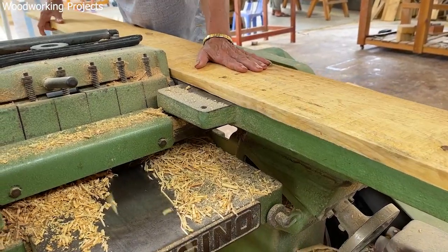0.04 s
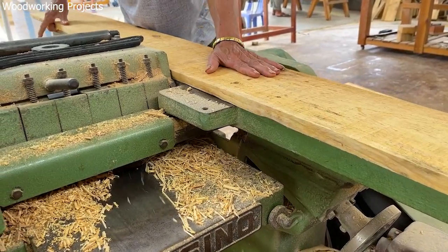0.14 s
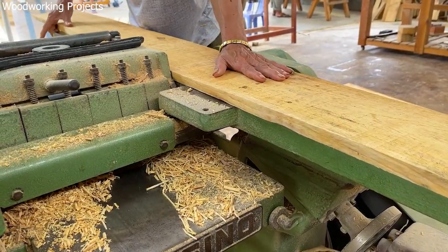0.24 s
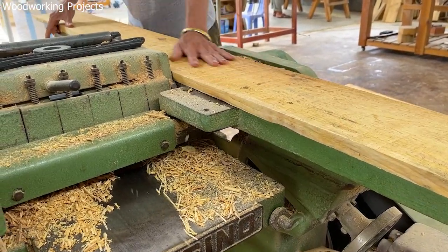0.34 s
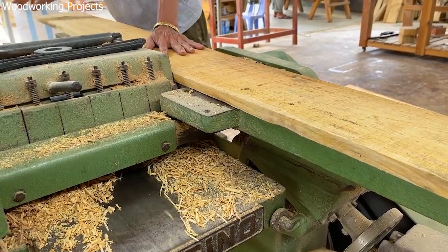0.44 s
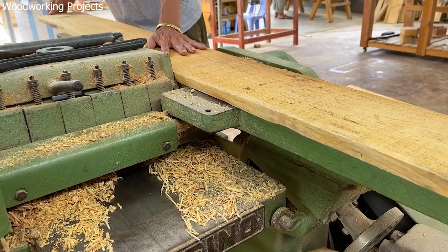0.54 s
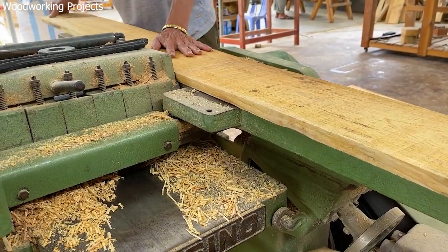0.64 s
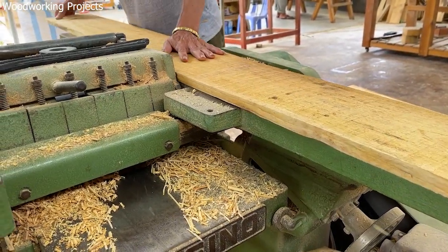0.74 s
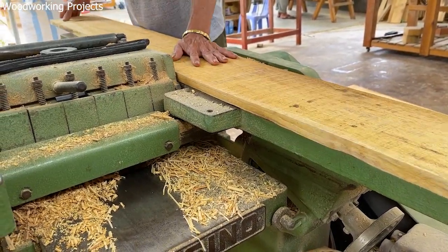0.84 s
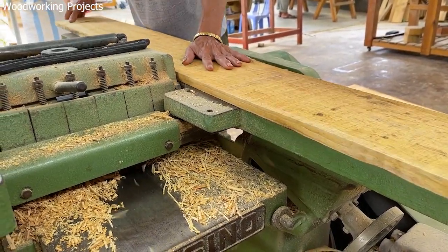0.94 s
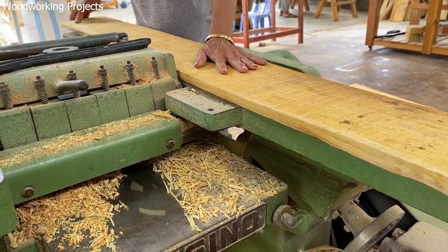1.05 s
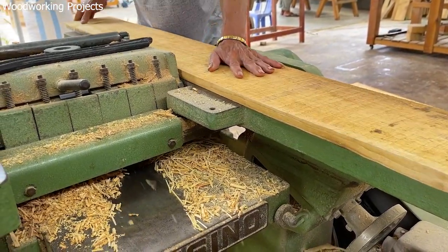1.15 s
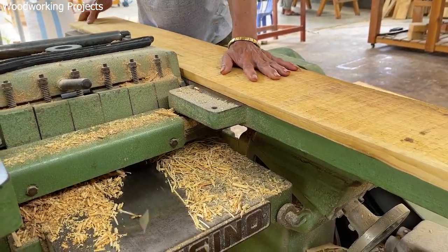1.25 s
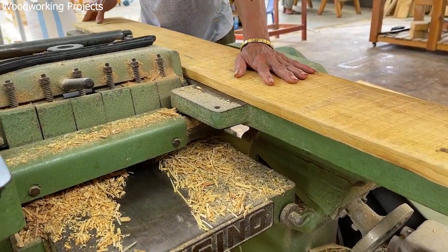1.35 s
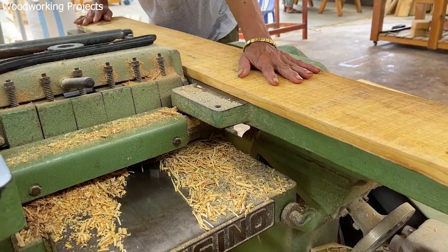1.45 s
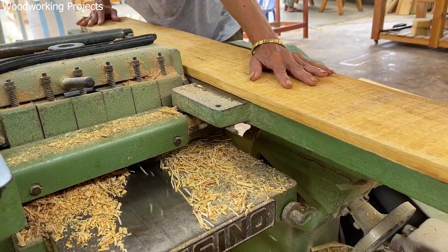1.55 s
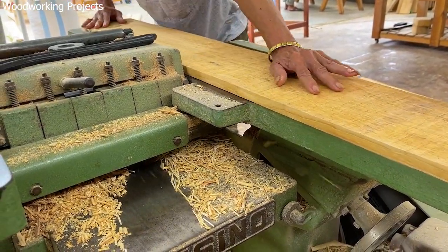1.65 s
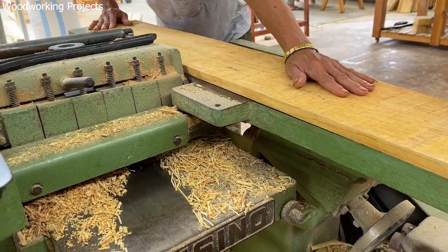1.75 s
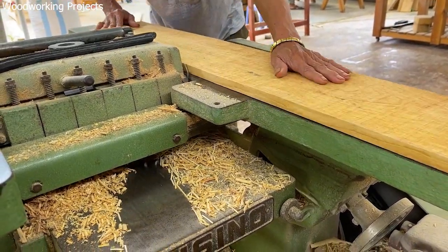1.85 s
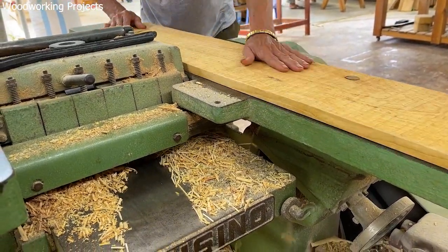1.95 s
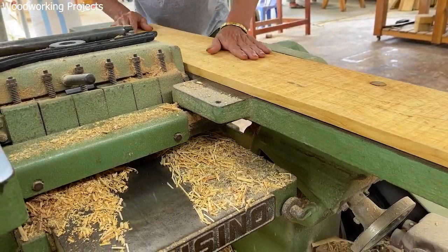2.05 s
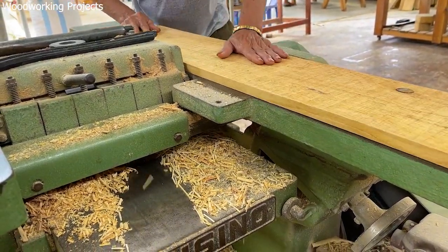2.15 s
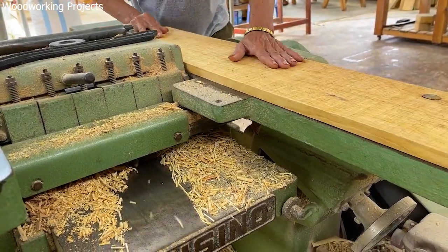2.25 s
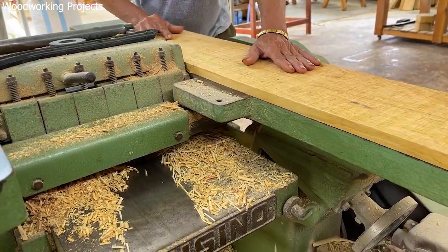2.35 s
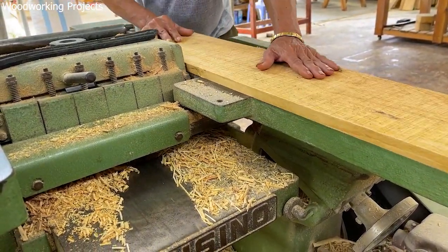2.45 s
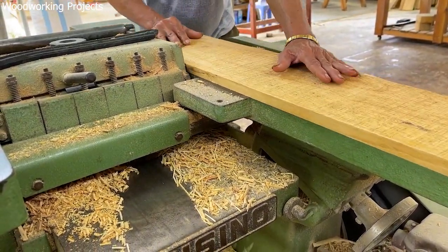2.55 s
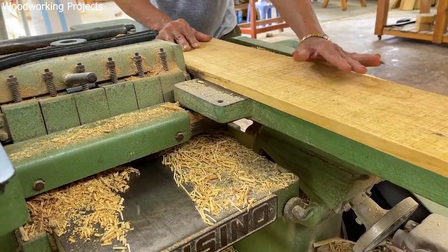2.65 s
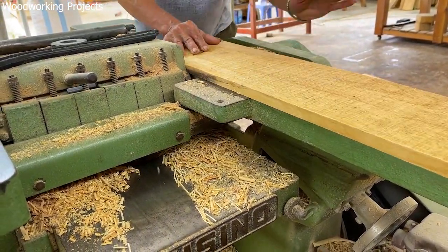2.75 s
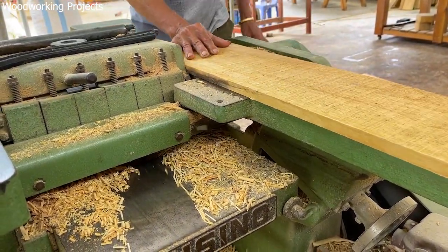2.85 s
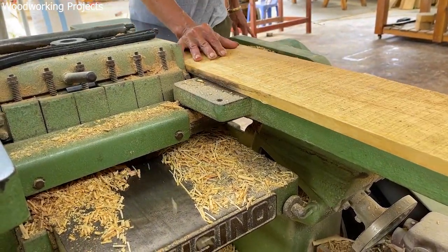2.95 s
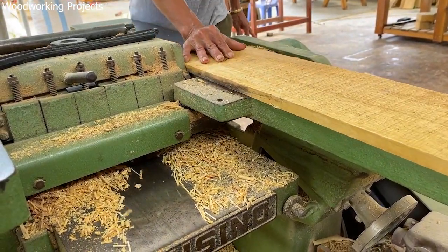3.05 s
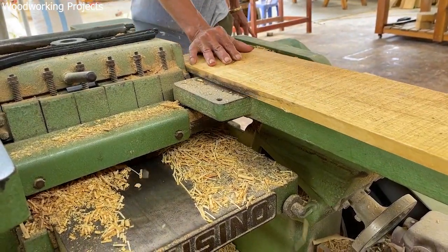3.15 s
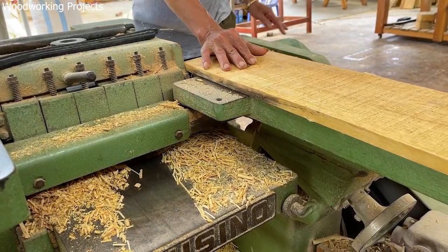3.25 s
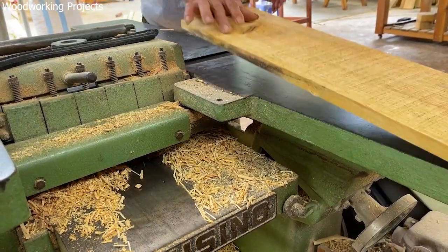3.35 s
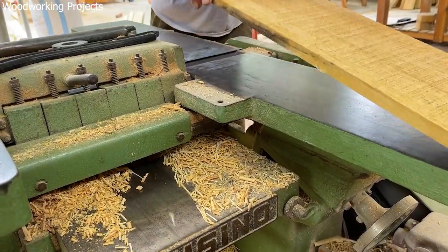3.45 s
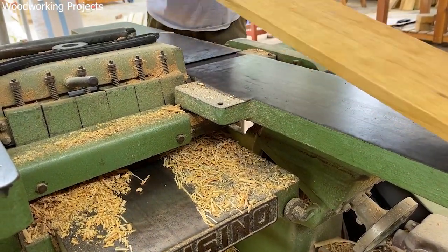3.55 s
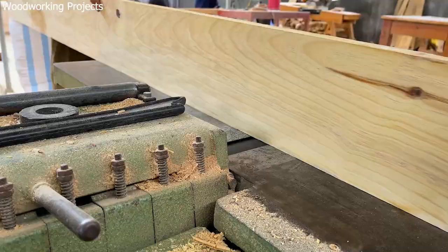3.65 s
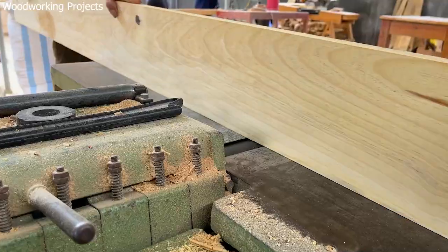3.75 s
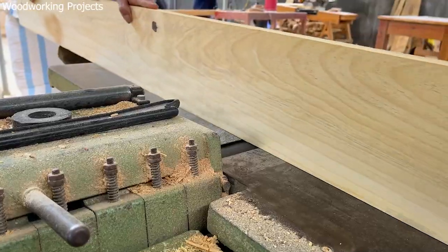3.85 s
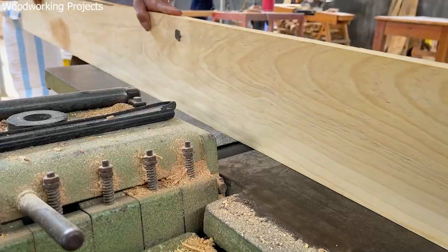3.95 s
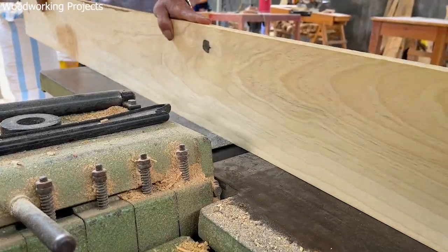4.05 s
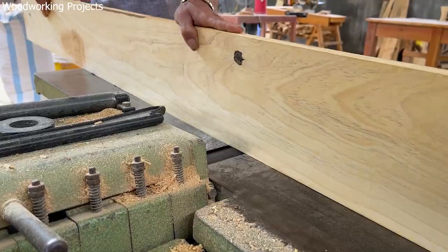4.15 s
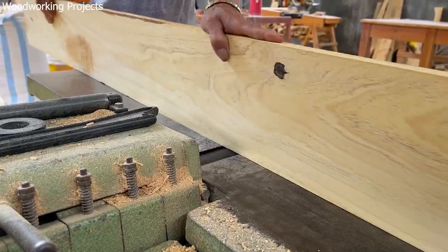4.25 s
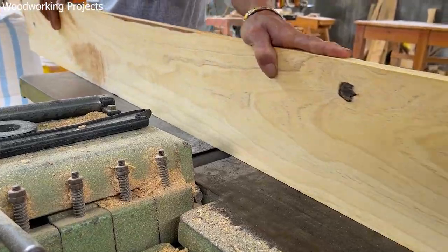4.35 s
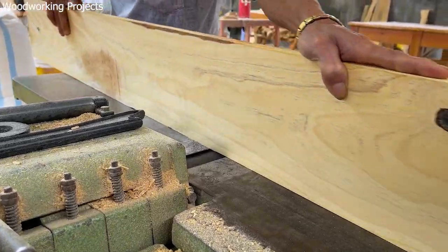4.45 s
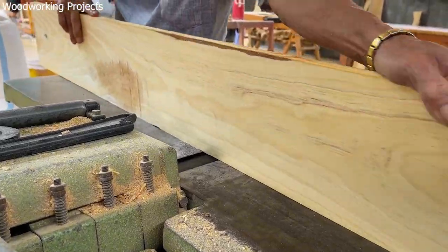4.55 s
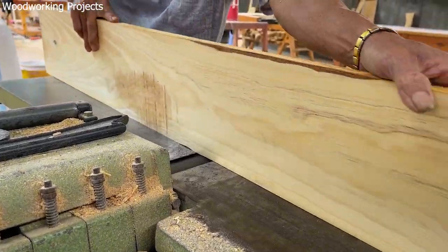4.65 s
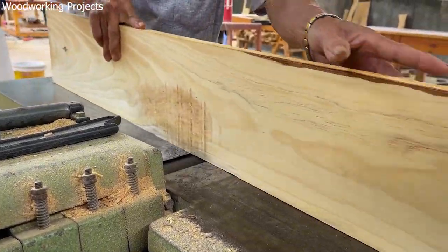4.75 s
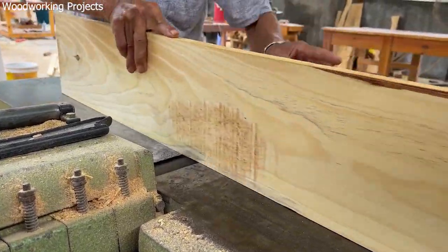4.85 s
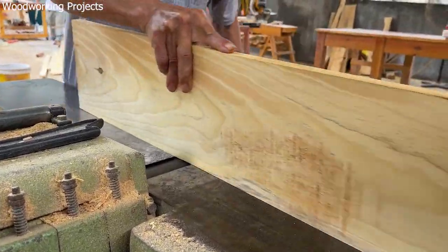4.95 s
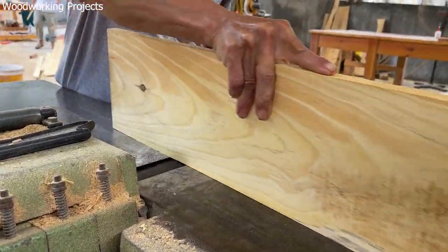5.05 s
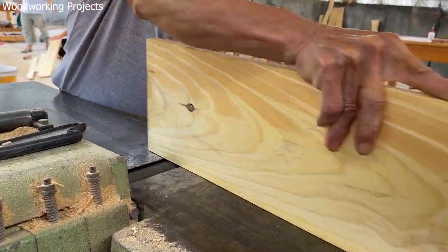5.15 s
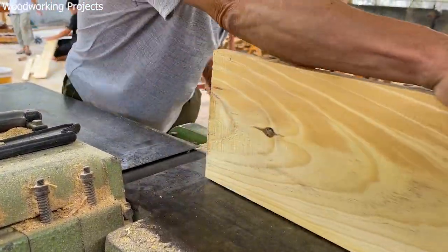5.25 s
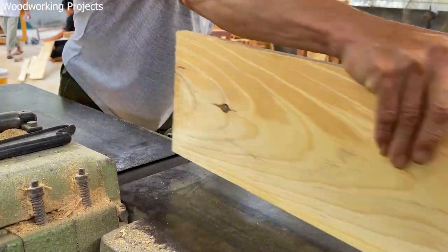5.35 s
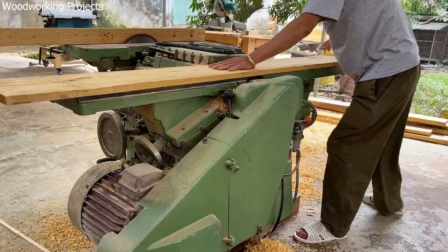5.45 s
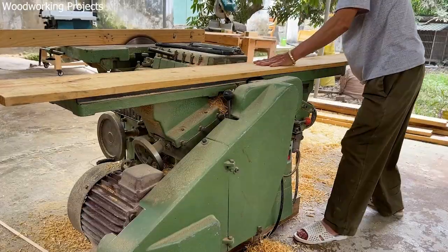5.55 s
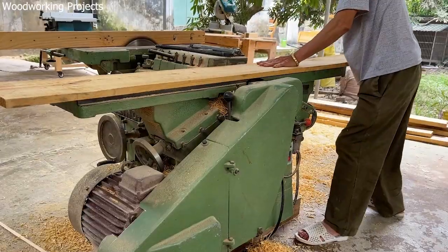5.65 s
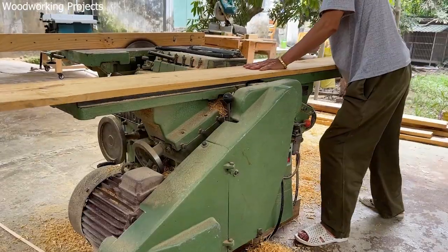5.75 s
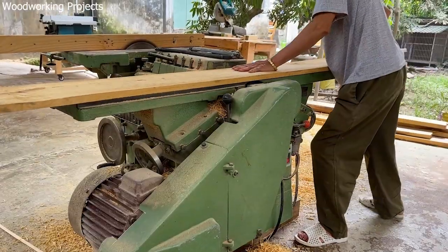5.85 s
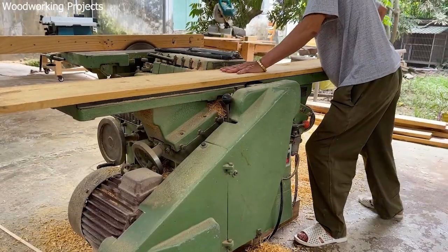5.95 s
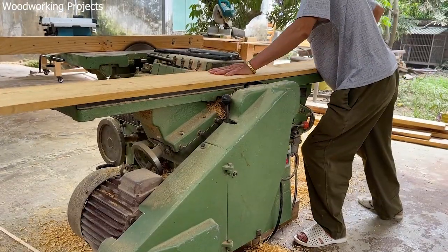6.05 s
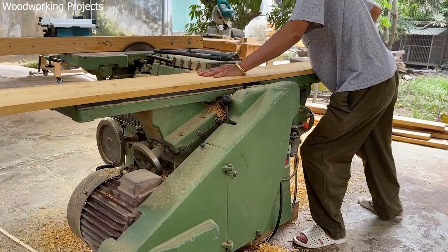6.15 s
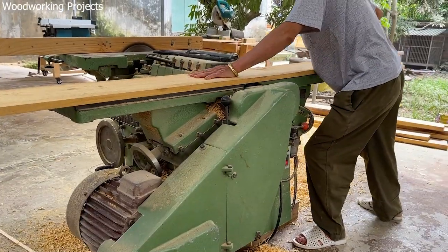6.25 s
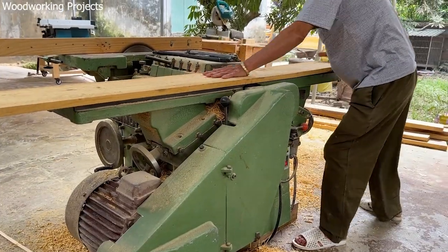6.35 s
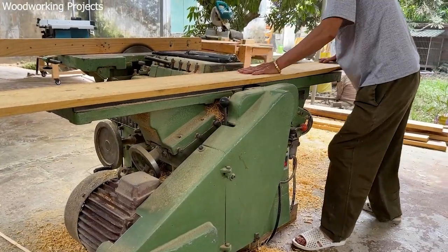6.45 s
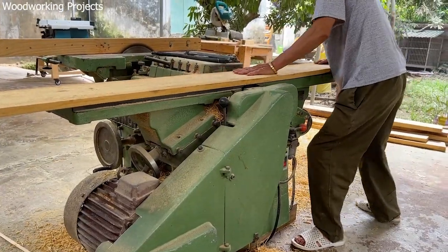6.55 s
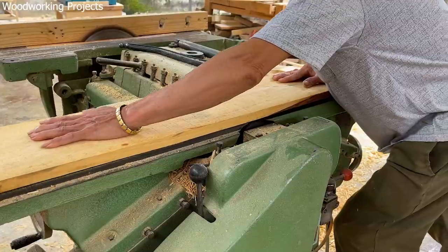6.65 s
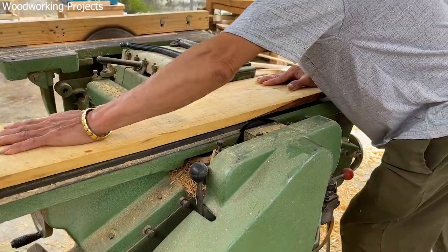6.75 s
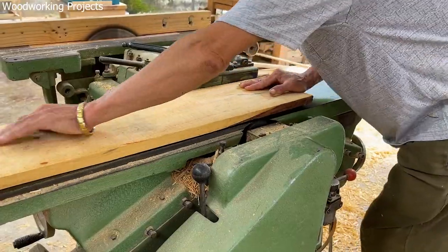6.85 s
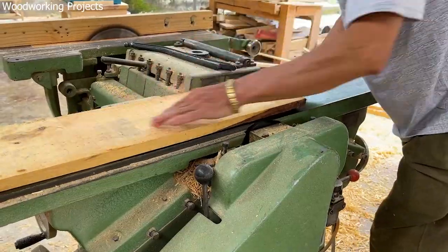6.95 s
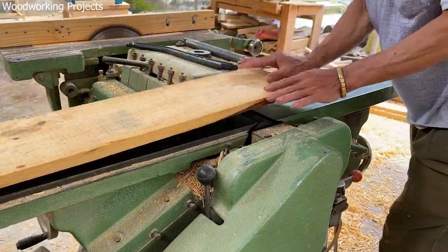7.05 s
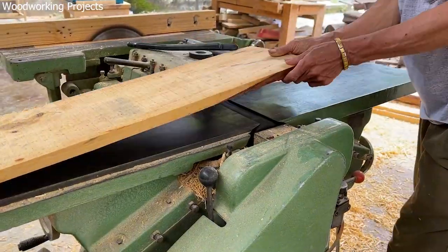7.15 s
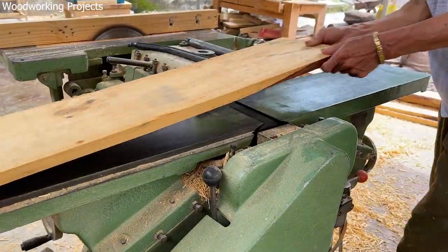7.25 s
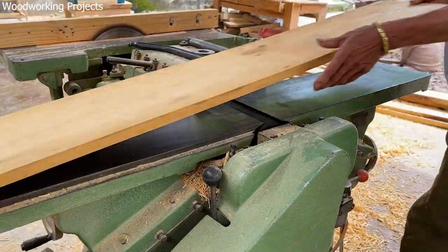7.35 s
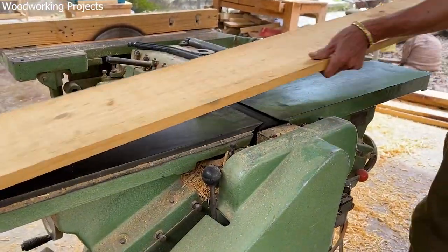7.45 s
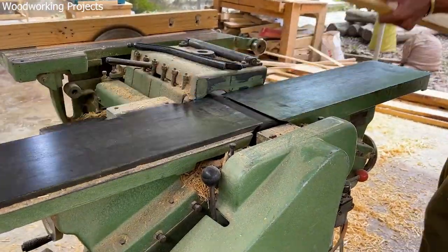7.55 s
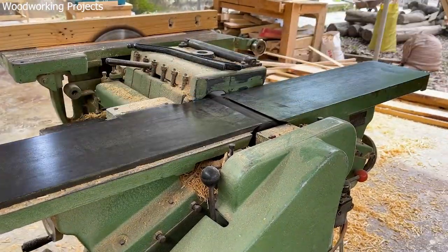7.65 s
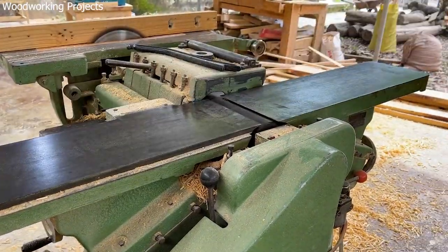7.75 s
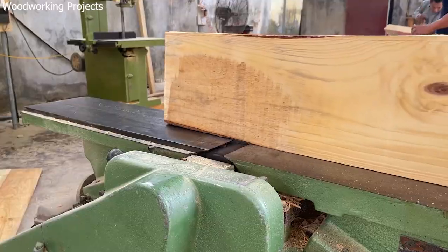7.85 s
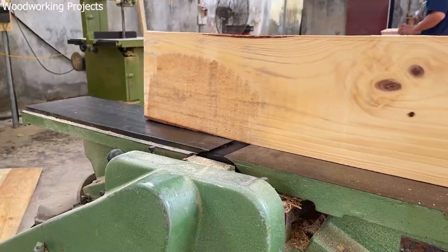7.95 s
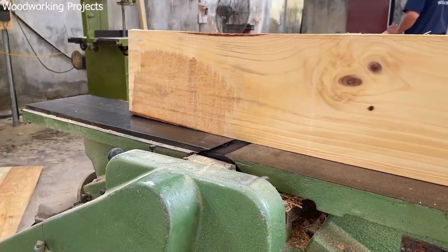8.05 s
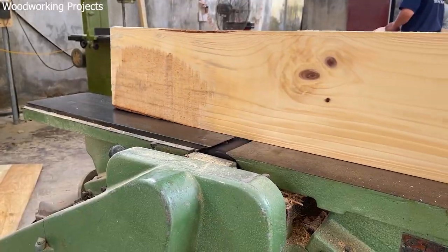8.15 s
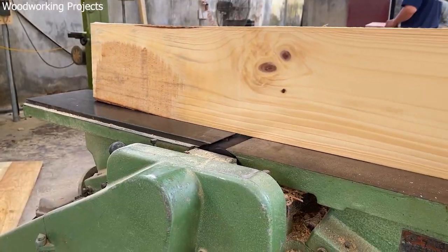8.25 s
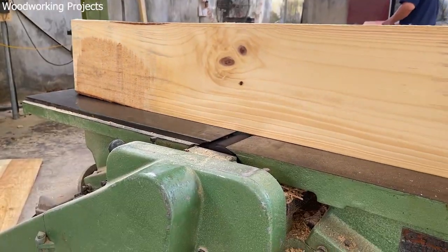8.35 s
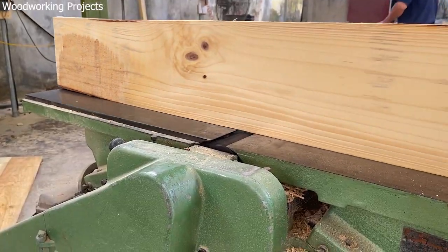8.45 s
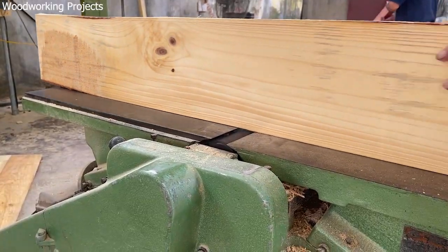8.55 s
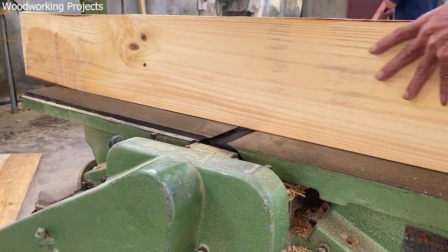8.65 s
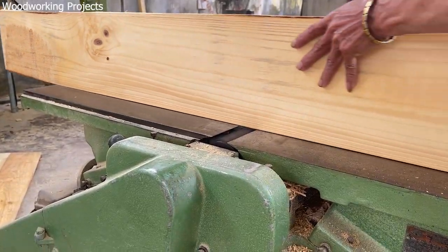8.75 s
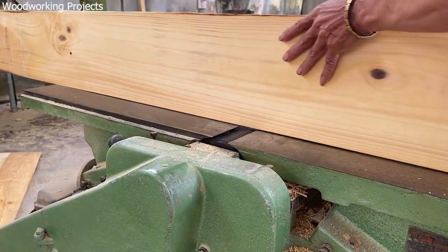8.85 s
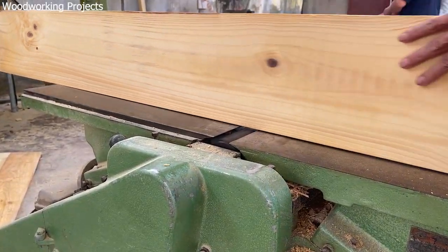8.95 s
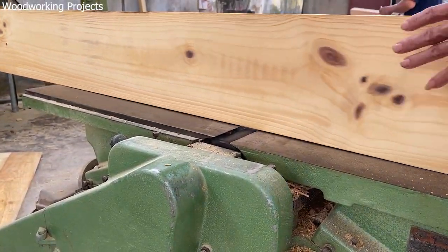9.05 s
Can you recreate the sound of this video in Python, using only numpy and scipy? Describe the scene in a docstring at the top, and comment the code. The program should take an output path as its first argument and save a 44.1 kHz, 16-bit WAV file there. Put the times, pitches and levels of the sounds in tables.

```python
"""A two-knife jointer cuts boards in an open wood shop: each knife stroke clicks, tears fibres and rings the board.
A harder bite is louder, hums more and slows the cutter head. A cut is under way at the start; the board bounces
on the table, and two longer pushes follow with more bounces. After a scrape of wood on iron come a gap of a few
milliseconds and a heavier push. From a second gap on, thin bearing whistles join in, with three short pushes
(a gap in the last), more scrapes, a fourth gap and a last push with a strong hum."""
import sys
import numpy as np
from scipy import signal
from scipy.fft import rfft, irfft, next_fast_len
from scipy.io import wavfile
from scipy.ndimage import uniform_filter1d, map_coordinates

SR = 44100
rng = np.random.default_rng(int(sys.argv[2]) if len(sys.argv) > 2 else 0)


def wrap_up_sound(samples):
    """Save the sound to the file named by the first command line argument, as 16-bit audio."""
    columns = np.atleast_2d(samples).T
    # keep every value between -1 and 1, then stretch to whole-number steps
    tamed = np.clip(columns, -1, 1)
    steps = np.round(tamed * 32767).astype(np.int16)
    wavfile.write(sys.argv[1], SR, steps)


N = 401751
TIME = np.arange(N) / SR

# Pushes of a board; ring, hum and sag hold at the usual bite. Each row: start in seconds, end in seconds,
# attack in seconds, board ring in dB, cutting hum in dB, speed sag in Hz, board reflections in dB,
# room reflections in dB, shifts of the echoes per second.
PASSES = [(0, 0.302, 0.0014, -37, -49, 4.3, -13, 1.5, 2.6),
          (0.643, 1.5, 0.048, -38, -45, 3.12, -5.5, -0.5, 3.43),
          (1.481, 3.185, 0.046, -38, -46.5, 3.4, 1, -13.5, 3.2),
          (3.701, 5.189, 0.0049, -37, -49, 0.77, 2, -17, 10.5),
          (5.723, 6.339, 0.025, -35.5, -50.5, 1.68, 6, 4.5, 5.9),
          (6.533, 6.618, 0.036, -39.5, -52, 0.48, 13, 9, 4.4),
          (6.615, 6.837, 0.002, -40.5, -48, 0.72, 2, -3, 10.4),
          (7.831, 9.112, 0.0024, -35, -38.5, 0.54, 4.5, -1, 10.5)]
# How hard the knives bite, one list per push. Each row: time in seconds, bite in dB, chip fizz against it in dB.
CUTS = [
    [(0.0, -34, 0), (0.13, -35, -1), (0.276, -35, -7), (0.31, -36, -7)],
    [(0.68, -33.5, 1.5), (0.69, -30.5, -1), (0.728, -29, 0.5), (0.86, -31.5, -5.5), (0.936, -34, -1.5),
     (1.03, -32.5, -2), (1.206, -37.5, 0), (1.272, -35.5, -4.5), (1.382, -35.5, -0.5), (1.43, -38, -9),
     (1.49, -39, -7)],
    [(1.5, -39.5, -12), (1.536, -41.5, -5), (1.58, -34.5, -3), (1.74, -35, -3), (1.806, -35.5, -3),
     (1.816, -31.5, -7.5), (1.9, -32, -8), (2.068, -34.5, -5.5), (2.096, -38.5, 0), (2.128, -34.5, -6.5),
     (2.224, -36, -2), (2.346, -33, -7.5), (2.546, -29.5, -5), (2.584, -29.5, -8.5), (2.654, -30.5, -4),
     (2.848, -29, -9), (2.966, -35.5, -2), (3.028, -34.5, -2), (3.146, -37, -3), (3.176, -34, 2),
     (3.2, -30.5, -1.5)],
    [(3.72, -35, -11.5), (3.95, -27.5, -10), (3.984, -24, -10.5), (4.186, -36, -6), (4.248, -31, -11.5),
     (4.338, -33.5, -7), (4.382, -30.5, -14), (4.442, -29.5, -8), (4.488, -27.5, -16), (4.618, -30.5, -14),
     (4.638, -27.5, -15), (4.72, -26.5, -12.5), (4.736, -33, -6), (4.764, -28.5, -14), (4.94, -31.5, -9.5),
     (4.956, -29, -11.5), (5.066, -32, -6), (5.102, -26.5, -16), (5.13, -30, -4.5), (5.18, -33, -10)],
    [(5.745, -33, -2), (5.787, -26, -9), (6.007, -28.5, -8.5), (6.105, -33, -9), (6.177, -30, -8),
     (6.191, -36, -5), (6.29, -34, -4.5), (6.335, -39.5, -6)],
    [(6.56, -39.5, -5.5), (6.6, -30, -6), (6.616, -27.5, -11)],
    [(6.635, -46, 3), (6.687, -34, -6), (6.697, -42.5, -3), (6.769, -40.5, -3.5), (6.81, -46.5, -11),
     (6.85, -54, -1)],
    [(7.84, -31, -4.5), (7.938, -34, -3.5), (8.008, -41.5, 2), (8.194, -37.5, -1), (8.454, -42.5, 3.5),
     (8.66, -44, 2.5), (8.79, -48, -11), (8.83, -52, -9), (9.1, -46, -11.5)],
]
# Ring of the board, one list per push. Each row: multiple of the idle knife rate, relative level in dB.
RINGS = [
    [(4, 13), (5, 0), (6, 11), (7, 2), (8, -16)],
    [(4, 2.5), (5, 1), (6, -0.5), (7, 5.5), (8, 7.5)],
    [(4, 11), (5, 6), (6, 6), (7, 7.5), (8, 11)],
    [(4, 1), (5, 5.5), (6, 7), (7, 4.5), (8, 7.5)],
    [(4, 18), (5, 14), (6, 13), (7, 10.5), (8, 15.5)],
    [(4, 18), (5, 5), (6, 15), (7, 8), (8, 6)],
    [(4, 12), (5, -4), (6, 8), (7, -13), (8, -1)],
    [(4, 6.5), (5, -3.5), (6, 2), (7, -5.5), (8, -1)],
]
# Colour of crack and fizz, one list per push. Each row: frequency in Hz, relative level in dB.
CRACKS = [
    [(1180, -22), (2000, -6), (2110, -7), (2640, -1.5), (3760, -12), (3930, -10), (4280, -10.5),
     (5650, -2.5), (6540, -17), (7980, 0), (11400, -9), (12800, -2), (15800, -12.5)],
    [(1180, -36), (2000, 6), (2110, 10.5), (2500, -1), (2570, 17), (2640, 1), (2900, 2), (4280, -3),
     (5600, 2), (7320, -8.5), (9080, -16), (14100, -15.5), (15800, -18)],
    [(1180, -49.5), (2000, -10), (2110, 14.5), (2320, -24.5), (2380, 4), (2850, -3.5), (2930, 2.5),
     (3140, -2), (4210, -4), (6260, -8.5), (7910, -14.5), (12100, -17.5), (15800, -23.5)],
    [(1180, -37), (2000, 1), (2260, 8.5), (2340, -9.5), (2500, 4.5), (2850, 0), (3010, 3), (3290, 6.5),
     (3560, -5), (3830, -2), (4110, -10), (4380, -0.5), (4660, -11), (4920, -7), (6160, -3), (8550, -13),
     (11000, -14), (15800, -20)],
    [(1180, -48), (2000, 0), (2320, -3.5), (2400, 4), (2530, -7.5), (2590, -8), (3360, -2.5), (3830, -6),
     (4240, -4.5), (4670, -8.5), (6000, -6.5), (7710, -16.5), (15100, -27), (15800, -27)],
    [(1180, -46), (2000, -7), (2950, -9), (3290, -10), (3560, -6), (3830, -14), (4110, -5), (4660, -18),
     (5300, -9), (6200, -19), (7710, -8), (15800, -17)],
    [(1180, -62), (2000, -41), (2680, 3), (3010, -5), (3300, -13), (4400, -6), (5220, -12), (5900, -4),
     (6370, -11), (9990, -11), (15800, -27)],
    [(1180, -34), (2000, 1), (2260, -13), (2340, 5), (2500, -2.5), (2880, -11), (3000, -3.5), (3480, -11),
     (3930, -5.5), (4360, -21), (4750, -1.5), (4960, -12.5), (8050, -9), (9990, 0), (15800, -9)],
]
# Quick flutter of the bite as chips break off unevenly. One value per push, in dB.
FLUTTER = [.3, .8, .9, 1.1, 1.8, 1, 1, .8]
# Tearing noise against the clean click. One value per push, in dB.
TEAR = [-14, -12, -13, -14.5, -7, -9, -9, -8]
# Strength of the shifting treble echoes. One value per push, as a share.
ECHOES = [.12, .28, .25, .45, .2, .2, .2, .45]
# Shallow stretches, where the higher knife does most of the work. Each row: start in seconds, end in seconds.
SHALLOW = [(0, .4), (2.9, 3.6)]
# Sliding modes of the travelling board. Each row: start in seconds, end in seconds, first frequency in Hz,
# last frequency in Hz, width in Hz, level in dB.
SQUEALS = [(0, 0.16, 5950, 5940, 300, -35.5), (0.155, 0.325, 3420, 4200, 900, -37.5),
           (0.66, 1.146, 1384, 1310, 60, -44), (0.675, 0.85, 2240, 2150, 80, -43),
           (.675, .82, 4850, 4500, 900, -39), (0.696, 0.955, 6000, 5500, 450, -34.5),
           (.68, 0.92, 7050, 7040, 250, -42), (0.947, 1.099, 6900, 7100, 200, -59),
           (0.96, 1.256, 3100, 3070, 80, -57), (1.14, 1.44, 3880, 4100, 350, -41.5),
           (1.203, 1.42, 4950, 5070, 250, -46), (1.387, 1.8, 2994, 3100, 60, -46),
           (1.77, 2.036, 2680, 3340, 600, -47), (2.167, 2.48, 4923, 6035, 450, -36),
           (2.202, 2.72, 1930, 1880, 60, -40.5), (2.263, 2.53, 3750, 3950, 300, -38),
           (2.374, 2.607, 3980, 5600, 600, -34.5), (2.462, 2.802, 4970, 5300, 500, -33.5),
           (2.475, 2.63, 3250, 3260, 100, -35.5), (2.636, 2.907, 3748, 4205, 300, -36),
           (2.73, 2.98, 4270, 5000, 500, -37), (2.772, 3.03, 3250, 3280, 100, -40.5),
           (2.703, 2.95, 2170, 2200, 60, -44), (2.92, 3.167, 7700, 7200, 900, -37.5),
           (2.942, 3.22, 5900, 5170, 900, -36.5), (3.164, 3.192, 5000, 5100, 1000, -35.5),
           (3.705, 3.957, 3240, 3290, 100, -36), (3.72, 4.1, 1386, 1356, 60, -44),
           (3.927, 4.082, 3270, 3278, 160, -29.5), (3.957, 4.073, 4300, 4370, 100, -36),
           (3.944, 4.084, 2700, 2760, 150, -33), (3.97, 4.12, 3820, 3800, 100, -40),
           (4.384, 4.525, 6540, 6400, 200, -38), (4.43, 4.695, 1290, 1410, 60, -40),
           (4.202, 4.48, 3210, 3250, 100, -43), (4.148, 4.42, 4350, 4280, 100, -43),
           (4.448, 4.58, 3200, 3220, 200, -31), (4.609, 4.758, 3200, 3200, 199, -27.5),
           (4.616, 4.748, 4410, 4360, 120, -40), (4.66, 4.862, 2510, 2560, 100, -34),
           (4.674, 4.97, 1840, 1865, 60, -41), (4.735, 4.838, 6100, 5850, 300, -43),
           (4.76, 5.05, 3260, 3250, 120, -32), (4.9, 5.005, 4420, 4470, 120, -38.5),
           (4.93, 5.03, 6300, 5470, 300, -45), (5.025, 5.198, 3050, 3200, 300, -32),
           (5.053, 5.208, 1890, 1915, 60, -38.5), (5.114, 5.218, 4416, 4480, 120, -37),
           (5.727, 5.843, 4350, 4320, 120, -43), (5.747, 5.832, 6060, 5830, 500, -30),
           (5.737, 5.99, 1150, 1100, 60, -39), (5.761, 6.05, 1460, 1480, 60, -36.5),
           (5.784, 5.892, 3200, 3200, 120, -36), (5.748, 6.17, 2420, 2470, 60, -36),
           (5.926, 6.076, 5500, 5350, 500, -35.5), (5.85, 6.28, 1900, 1950, 50, -37.5),
           (6.584, 6.62, 1303, 1553, 400, -42), (6.63, 6.85, 2670, 2760, 120, -54),
           (6.66, 6.85, 3010, 3020, 100, -46), (7.828, 7.976, 4650, 4680, 50, -43.5),
           (7.83, 7.955, 8100, 7900, 450, -34.5), (7.87, 7.983, 5850, 5640, 179.6, -39),
           (7.828, 8, 3020, 3100, 90, -39.5), (8.046, 8.31, 3050, 3140, 70, -40),
           (8.098, 8.417, 1094, 1126, 40, -43.5), (8.13, 8.36, 4730, 4680, 60, -58),
           (8.162, 8.393, 9950, 9900, 260, -39.5), (8.33, 8.55, 5880, 6040, 90, -45),
           (8.497, 8.748, 6020, 5990, 100, -36), (8.6, 8.728, 9810, 9800, 400, -44),
           (8.439, 8.71, 2770, 2660, 80, -45)]
# Dead bands sliding between the modes. Each row: start in seconds, end in seconds, first frequency in Hz,
# last frequency in Hz, width in Hz.
NOTCHES = [(.74, 0.977, 3360, 3570, 400), (.86, 1.25, 3800, 7900, 600), (1.083, 1.26, 4100, 5100, 500),
           (1.17, 1.37, 3450, 2820, 450), (1.72, 1.974, 1828, 2084, 250), (2.234, 2.633, 3650, 6800, 796),
           (2.55, 2.905, 3500, 6450, 700), (3.975, 4.14, 4600, 5200, 600), (7.917, 8.04, 4500, 4350, 400),
           (8.27, 8.5, 5200, 5050, 400), (8.269, 8.5, 4520, 4450, 400)]
# Hum of the free head at the usual machine level. Each row: time in seconds, first, second and third partial in dB.
FREE_HUM = [(0, -60, -49.5, -64), (3.69, -62.5, -51, -60), (3.71, -54, -48, -58), (5.41, -57, -52, -61),
            (5.43, -62.5, -59.5, -79), (6.899, -58.5, -57.5, -68), (7.3, -52.5, -52.5, -56),
            (7.8, -53, -55.5, -67), (8.4, -53, -52.5, -61), (9.11, -47, -41, -42)]
# Speed sway from the belt. Each row: time in seconds, sway as a share of the speed.
BELT_SWAY = [(0, 0.0041), (3.6, 0.0024), (3.75, 0.01), (6.5, 0.0086), (9.11, 0.011)]
# Colour of the frame's rumble. Each row: frequency in Hz, relative level in dB.
FRAME_COLOUR = [(18, -99), (30, -60), (86, -54), (124, -12.5), (220, -10.5), (272, -8.5), (323, -9),
                (481, -5.5), (547, -11.5), (613, 0), (748, -3), (826, -26), (900, -14), (1170, -5),
                (1980, -120)]
# Colours of the whirled air before and after the second gap. Each row: frequency in Hz, relative level in dB.
EARLY_AIR_COLOUR = [(290, -35), (500, -21), (537, -15), (853, -15.5), (1140, -12), (1440, -9.5),
                    (2060, -11), (2180, -10.5), (2790, -9.5), (3130, -12), (3890, -15), (5750, -23),
                    (6830, -14), (7240, -21), (15800, -36.5)]
LATE_AIR_COLOUR = [(290, -30.5), (500, -17), (621, -12.5), (783, -6.5), (1420, -3.5), (1810, -1.5),
                   (2180, -10), (2710, -3), (3000, -9), (4630, -13), (6090, -17.5), (6930, -7.5),
                   (7900, -17), (9950, -18), (15800, -22.5)]
# Loudness of the running machine. Each row: time in seconds, level in dB.
AIR_LEVEL = [(0, -48), (3.7, -49), (3.715, -42), (5.3, -46), (5.42, -43.5), (5.43, -45.5), (6.5, -48.5),
             (7.05, -48), (7.3, -46), (7.6, -46), (7.85, -42.5), (9.11, -47.5)]
# Hiss of a bearing. Each row: time in seconds, level in dB.
BEARING_LEVEL = [(0, -79), (3.6, -67), (5.25, -54), (5.41, -46), (5.44, -62), (7, -71), (9.11, -72)]
# Faint wandering bearing whistles. Each row: mean frequency in Hz, mean level in dB.
WHISTLES = [(10000, -67), (13200, -67)]
# Bounces of the board on the table. Each row: time in seconds, strength of the blow in dB.
LANDINGS = [(0.304, -41.5), (.392, -36.5), (.471, -33), (0.555, -31), (.64, -33), (0.724, -34),
            (0.813, -38), (0.896, -53), (2.448, -35), (2.547, -31.5), (2.641, -31.5), (2.737, -32),
            (2.829, -36), (2.924, -35), (3.016, -37.5), (3.107, -33), (3.195, -37.5), (3.28, -40),
            (3.364, -41), (3.835, -28.5), (3.935, -28), (4.033, -29.5), (4.123, -33), (4.212, -33),
            (4.303, -36), (4.396, -36), (5.515, -46)]
# Modes of the landing board. Each row: frequency in Hz, relative level in dB, T60 in seconds.
BOARD_MODES = [(237, -22, 0.21), (295, -7, 0.083), (321, -6.5, 0.13), (395, -3.5, 0.14), (433, -17.5, .11),
               (519.4, -2.5, 0.13), (597, -4.5, 0.1), (667, -10.5, 0.16), (787, -4, 0.11), (894, -23, 0.1)]
# Colour of a landing's rattle. Each row: frequency in Hz, relative level in dB.
KNOCK_COLOUR = [(59, -64), (100, -31), (349, -3), (555, -29), (911, -3), (1180, -4.5), (1450, -5),
                (2680, -5), (3350, -6), (6000, -18), (7800, -28), (13200, -120)]
# Drags of wood over iron. Each row: start in seconds, end in seconds, attack in seconds, level in dB.
SLIDES = [(3.603, 3.702, 0.018, -43.5), (4.95, 5.165, 0.049, -37.5), (5.062, 5.133, .035, -46),
          (6.609, 6.612, .006, -33.5), (7.316, 7.399, 0.05, -37), (7.411, 7.488, 0.029, -37.5),
          (8.455, 8.48, 0.0098, -43.5)]
# Colour of the drags. Each row: frequency in Hz, relative level in dB.
SLIDE_COLOUR = [(120, -67), (200, -21), (277, -5), (307, -46), (447, 4.5), (513, -32), (641, 6.5),
                (935, 0.5), (1760, 8), (5180, -5.5), (12000, -27), (15600, -58), (22000, -120)]
# Brief gaps in the sound. One time each, in seconds.
GAPS = [3.706, 5.424, 6.625, 7.825]
# Stereo width. Each row: frequency in Hz, gain of the side signal in dB.
WIDTH = [(60, -3), (110, -15), (200, -28), (380, -28), (700, -14), (1290, -11.5), (2380, -8), (4400, -5),
         (8120, -4.5), (15000, -3)]
# Stereo lean. Each row: frequency in Hz, left minus right gain in dB.
LEAN = [(60, -2.5), (110, -1), (200, 1), (380, -3), (700, -1.5), (1290, -1), (2380, 0.5), (4400, -2),
        (8120, 1), (15000, 3)]

RING_TOP_HZ, CRACK_TOP_HZ = 2320, 7500  # borders between ring, crack and fizz
TOP_HZ = 15950  # band limit of the whole sound
USUAL_BITE_DB, USUAL_AIR_DB = -30, -47
# dB gained for each dB of bite by the board ring, the cutting hum and the drag on the head
RING_GROWS, HUM_GROWS, DRAG_GROWS = 0.76, 1, 0.55
BASS_GROWS = 1.73  # dB of idle hum and frame rumble for each dB of machine level
RUMBLE_SWAY_DB = 2.3
RELEASE_T60_S = 0.1406  # a cut dies away when the wood leaves the knives
SECOND_KNIFE_DB, SHALLOW_KNIFE_DB = -2.2, -10  # lower knife against the higher, full and shallow cut
IDLE_HZ = 274.8  # knife strokes a second with the head running free
INERTIA_S = 0.0558  # time constant of the head following its load
KNOCK_ATTACK_S, RATTLE_T60_S = 0.0009, 0.19


def amp(db):
    """Level law: amplitude is ten to the power dB / 20."""
    return 10 ** (np.asarray(db) / 20)


def unit(x):
    """Normalization by mean power: scale to rms 1."""
    return x / np.sqrt(np.mean(x ** 2) + 1e-20)


def steady(x, size=2600):
    """Power equalization: hold the running rms of a mid and side pair at 1 (size in samples)."""
    return x / np.sqrt(np.abs(uniform_filter1d(x ** 2, size=size, axis=1)) + 1e-12)


def along(points, hz):
    """Linear interpolation of (Hz, value) points on a log frequency axis."""
    f, v = np.transpose(points)
    return np.interp(np.log(hz + 1), np.log(f + 1), v)


def curves(rows):
    """Linear interpolation in time: one curve for each column after the time."""
    s, *columns = np.transpose(rows)
    return [np.interp(TIME, s, column) for column in columns]


def wobble(rate):
    """Band-limited randomness: a smooth curve through rate random knots a second."""
    knots = rng.standard_normal(int(N * rate / SR) + 4)
    return map_coordinates(knots, [TIME * rate])


def filtered(x, gain):
    """Minimum-phase filtering: the folded cepstrum of a gain curve gives a causal response."""
    n = x.shape[-1]
    m = 2 * next_fast_len(n // 2 + 4096)
    cepstrum = irfft(np.log(np.maximum(gain(np.fft.rfftfreq(m, 1 / SR)), 1e-6)))
    cepstrum[1:m // 2] *= 2
    cepstrum[m // 2 + 1:] = 0
    return irfft(rfft(x, m) * np.exp(rfft(cepstrum)), m)[..., :n]


def band(hz, lo, hi, order=10):
    """Butterworth magnitude law: gain of a band-pass."""
    return ((1 + (lo / (hz + 1)) ** (2 * order)) * (1 + (hz / hi) ** (2 * order))) ** -.5


def rush(colour, low_hz=30):
    """Shaped random noise: mid and side with a (Hz, dB) colour and a joint rms of 1."""
    noise = rng.standard_normal((2, N))
    return unit(filtered(noise, lambda hz: amp(along(colour, hz)) * band(hz, low_hz, SR, order=3)))


def hiss(centre_hz, width_hz):
    """Resonance of a noise-driven part: a narrow band with a joint rms of 1."""
    noise = rng.standard_normal((2, N))
    return unit(filtered(noise, lambda hz: 1 / (1 + ((hz - centre_hz) / width_hz) ** 2)))


def envelope(start, end, attack, t60):
    """Build-up and exponential decay: rise, hold until the end, then die away."""
    rise = np.sin(np.pi / 2 * np.clip((TIME - start) / max(attack, 1e-4), 0, 1))
    return rise * amp(-60 * np.clip((TIME - end) / t60, 0, 2))


def swell(x, curve):
    """Amplitude modulation by an arch: fade in and out as a power of a half sine."""
    return x * np.abs(np.sin(np.linspace(0, np.pi, x.shape[-1]))) ** curve


def resonance(x, first_hz, last_hz, width_hz):
    """Heterodyne principle: shift a sliding mode to zero, low-pass it and shift it back."""
    spin = np.exp(2j * np.pi * np.cumsum(np.linspace(first_hz, last_hz, x.shape[-1])) / SR)
    return 2 * (signal.lfilter(*signal.butter(1, width_hz / 2, fs=SR), x / spin) * spin).real


def pushes():
    """Loading of the knives, per push: envelope, bite over the usual one (dB), fizz against the bite (dB)."""
    work = []
    for (start, end, attack, *_), rows in zip(PASSES, CUTS):
        bite, fizz = curves(rows)
        work.append((envelope(start, end, attack, RELEASE_T60_S), bite - USUAL_BITE_DB, fizz))
    return work


def shallowness(ease_s=0.37):
    """Depth of cut, eased by a running mean: 0 in a full cut, 1 in a shallow one."""
    inside = sum(1. * (TIME < end) * (TIME >= start) for start, end in SHALLOW)
    return uniform_filter1d(inside, size=int(ease_s * SR) + 1)


def head_turn(work, belt_hz=18.5):
    """Rotational inertia: knife strokes so far, as drag slows the head and each belt lap sways its speed."""
    drag = 0
    for (_, _, _, _, _, sag_hz, *_), (gate, bite, _) in zip(PASSES, work):
        drag = drag + sag_hz * gate * amp(DRAG_GROWS * bite)
    keep = np.exp(-1 / (INERTIA_S * SR))
    # the head is already slowed at the start
    sag = signal.lfilter([1 - keep], [1, -keep], drag, zi=[keep * drag[SR // 20]])[0]
    sway = curves(BELT_SWAY)[0] * np.sin(2 * np.pi * belt_hz * TIME)
    return np.cumsum((IDLE_HZ - sag) * (1 + sway)) / SR


def strokes(turn):
    """Periodic impulsive excitation: one impulse for each knife stroke, the two knives biting unequally."""
    count = np.arange(1, int(turn[-1]))
    chance = rng.standard_normal((len(count), 2))
    at = np.interp(count, turn, np.arange(N)) + .17 * chance[:, 0]  # jitter in samples
    shallow = np.interp(count, turn, shallowness())
    lower_db = SECOND_KNIFE_DB + (SHALLOW_KNIFE_DB - SECOND_KNIFE_DB) * shallow
    size = amp(.8 * chance[:, 1] + count % 2 * lower_db)
    # windowed sinc pulses fall between samples
    taps = at.astype(int)[:, None] + np.arange(-7, 9)
    off = taps - at[:, None]
    shape = np.sinc(off) * np.cos(np.pi * off / 16) ** 2
    return np.bincount(np.clip(taps, 0, N - 1).ravel(), (size[:, None] * shape).ravel(), N)


def machine(turn, frame_db=-54.5, chop=0.048, knife_chop=0.053, housing_db=-10):
    """Broadband flow noise and resonance: frame rumble, whirled air, and narrow housing and bearing bands."""
    air_db = curves(AIR_LEVEL)[0]
    rumble_db = frame_db + BASS_GROWS * (air_db - USUAL_AIR_DB) + RUMBLE_SWAY_DB * wobble(12)
    frame = amp(rumble_db) * rush(FRAME_COLOUR)
    early, late = rush(EARLY_AIR_COLOUR, low_hz=200), rush(LATE_AIR_COLOUR, low_hz=200)
    whirl = np.where(TIME < GAPS[1], early, late)
    housing = amp(housing_db) * hiss(2780, 110)
    air = amp(air_db + .9 * wobble(20)) * (whirl + housing)
    bearing = amp(curves(BEARING_LEVEL)[0]) * hiss(6850, 330)
    # once per turn of the head and once per knife
    pulse = 1 + chop * np.sin(np.pi * turn) + knife_chop * np.sin(2 * np.pi * turn)
    return frame + (air + bearing) * pulse


def whistles(wander=0.029, blur=0.00386):
    """Frequency modulation: thin bearing tones drift up and down after the second gap."""
    drift = wobble(5.5)
    out = np.zeros((2, N))
    for hz, db in WHISTLES:
        pitch = hz * (1 + wander * drift + blur * wobble(300))
        phase = 2 * np.pi * np.cumsum(pitch) / SR
        tones = np.array([np.sin(phase), np.sin(phase + 2 * wobble(5))])
        out += amp(db + 1.2 * wobble(5.9)) * tones
    return out * (TIME > GAPS[1])


def hum(turn, work, cut_db=(-15, 1, 1), upper_db=-18, rise_db=1.0, waver_db=1.1):
    """Siren principle: knives chop the air at the table lips into partials, the lowest three growing with bite."""
    air_db = curves(AIR_LEVEL)[0]
    near = amp(BASS_GROWS * (air_db - USUAL_AIR_DB))
    loaded = 0
    for (_, _, _, _, hum_db, *_), (gate, bite, _) in zip(PASSES, work):
        loaded = loaded + gate * amp(hum_db + HUM_GROWS * bite)
    sizes = [np.hypot(near * amp(free), loaded * amp(db)) for free, db in zip(curves(FREE_HUM), cut_db)]
    # four fainter partials above follow the machine level
    sizes += [amp(air_db + upper_db + rise_db * k) for k in range(4)]
    tone = np.zeros(N)
    for k, size in enumerate(sizes, 1):
        tone += size * amp(waver_db * wobble(14)) * np.sin(2 * np.pi * (k * turn + rng.random()))
    return np.array([tone, 0.67 * tone])


def chatter(rattle_db=-7, modes_db=-4):
    """Impact excitation of modes: each landing on the table thumps the board's low modes and rattles briefly."""
    t = np.arange(SR // 3) / SR
    thumps, blows = np.zeros((2, N + SR))
    mode_hz, mode_db, mode_t60 = np.transpose(BOARD_MODES)[:, :, None]
    for s, db in LANDINGS:
        chance = rng.standard_normal((3, len(mode_hz), 1))
        hz = mode_hz * (1 + .015 * chance[1])
        decay = amp(mode_db + 1.5 * chance[0] - 60 * t / mode_t60)
        ring = decay * np.sin(2 * np.pi * (hz * t + .15 * chance[2]))
        blow = amp(db) * (1 - np.exp(-t / KNOCK_ATTACK_S))
        thumps[round(s * SR):][:len(t)] += blow * ring.sum(axis=0)
        blows[round(s * SR):][:len(t)] += blow * amp(-60 * t / RATTLE_T60_S)
    rattle = amp(rattle_db) * blows[:N] * steady(rush(KNOCK_COLOUR), size=600)
    return filtered(rattle + amp(modes_db) * thumps[:N], lambda hz: band(hz, 188, SR, order=5))


def sliding(release_t60=0.14, catch_db=3):
    """Friction noise: wood drags over the iron table, catching unevenly."""
    level = sum(amp(db) * envelope(start, end, attack, release_t60) for start, end, attack, db in SLIDES)
    return level * steady(amp(catch_db * wobble(220)) * rush(SLIDE_COLOUR), size=1300)


def tail(t60):
    """Exponential decay of a diffuse field: mid and side reflections of energy 1 each."""
    t = np.arange(SR // 6) / SR
    h = rng.standard_normal((2, len(t))) * amp(-60 * t / t60)
    return h / np.linalg.norm(h, axis=1, keepdims=True)


def evened(paths, share=0.14):
    """Spectral compression: reflections with their peaks and dips partly levelled."""
    n = paths.shape[1]
    z = rfft(paths, 2 * n)
    return irfft(z / (np.abs(z) + 1e-6) ** share)[:, :n]


def through_board(x, board_db, room_db, board_t60=0.033, room_t60=0.42):
    """Superposition of direct and reflected sound; board and shop paths change as the board travels."""
    step = SR // 5
    n = len(x)
    out = np.zeros((2, n + SR))
    for centre in range(0, n + step, step):
        a, b = max(centre - step, 0), min(centre + step, n)
        paths = amp(board_db) * tail(board_t60) + amp(room_db) * tail(room_t60)
        paths[0] = signal.lfilter(*signal.butter(1, 1800, "high", fs=SR), paths[0])
        paths[0, 0] += 1  # direct sound, in mid only
        paths = evened(paths)
        paths /= np.linalg.norm(paths, axis=1, keepdims=True)
        fade = np.cos(np.pi / 2 * (np.arange(a, b) - centre) / step) ** 2
        y = signal.fftconvolve((x[a:b] * fade)[None], paths, axes=1)
        out[:, a:a + y.shape[1]] += y
    return out[:, :n]


def swish(x, span, shifts, echo, travel_s=.00004, paths_s=(.00023, .00047, .00078), above_hz=4500):
    """Comb-filter interference: treble echoes between board and table change length as the board rocks."""
    i = np.arange(x.shape[-1])
    treble = signal.sosfiltfilt(signal.butter(2, above_hz, "high", fs=SR, output="sos"), x)
    echoes = np.zeros_like(x)
    for path in paths_s:
        delay = SR * (path + travel_s * wobble(shifts)[span])
        echoes += np.array([map_coordinates(channel, [i - delay]) for channel in treble])
    return x + echo * echoes


def squeals(clicks):
    """Forced resonance: the strokes drive narrow modes whose pitch slides while they swell and fade."""
    out = np.zeros((2, N))
    for start, end, first_hz, last_hz, width_hz, db in SQUEALS:
        span = slice(int(start * SR), int(end * SR))
        drive = through_board(-clicks[span], board_db=-7.5, room_db=-6)
        mode = steady(resonance(drive, first_hz, last_hz, width_hz), size=970)
        out[:, span] += amp(db) * swell(mode, curve=0.56)
    return filtered(out, lambda hz: band(hz, 580, SR, order=3))


def unsung(level, song, least=0.38):
    """Energy sharing: the size left once the singing modes have taken their part of the level."""
    taken = uniform_filter1d(song ** 2, size=2600)
    return np.sqrt(np.maximum(level ** 2 - taken, least * level ** 2))


def voice(x, colour, lo, hi):
    """Source-filter principle: one band of the cut in the board's colour, at a running rms of 1."""
    return steady(filtered(x, lambda hz: amp(along(colour, hz)) * band(hz, lo, hi)))


def cutting(clicks, work, song, tear_s=0.0032, shallow_ring_db=-5, crack_db=0.34, fizz_tear_db=7,
            ring_echo_db=-7, uneven_db=1.08):
    """Impulsive fracture: each stroke clicks and tears fibres, coloured by the board, uneven with the grain."""
    decay = np.exp(-1 / (tear_s * SR))
    burst = signal.lfilter([1], [1, -decay], clicks) * rng.standard_normal(N)
    low_song = filtered(song, lambda hz: band(hz, 1020, RING_TOP_HZ))
    high_song = filtered(song, lambda hz: band(hz, RING_TOP_HZ, CRACK_TOP_HZ))
    grain, shallow = amp(uneven_db * wobble(22)), shallowness()
    out = np.zeros((2, N))
    settings = zip(PASSES, work, RINGS, CRACKS, TEAR, ECHOES, FLUTTER)
    for row, (gate, bite, fizz), ring, crack, tear_db, echo, flutter_db in settings:
        start, end, _, ring_db, _, _, board_db, room_db, shifts = row
        span = slice(max(int(start * SR), 0), min(int((end + RELEASE_T60_S) * SR), N))
        ring_level = ring_db + RING_GROWS * bite[span] + shallow_ring_db * shallow[span]
        level = USUAL_BITE_DB + bite[span]
        click = unit(through_board(-clicks[span], board_db, room_db))
        tear = amp(tear_db) * unit(through_board(burst[span], board_db, room_db))
        # long waves come almost straight from the board
        thrum = unit(through_board(-clicks[span], ring_echo_db, ring_echo_db)) + tear
        ring_colour = [(k * IDLE_HZ, db) for k, db in ring]
        ring_voice = voice(thrum, ring_colour, 1117, RING_TOP_HZ)
        snap = swish(click + tear, span, shifts, echo)
        crack_voice = voice(snap, crack, RING_TOP_HZ, CRACK_TOP_HZ)
        spray = swish(click + amp(fizz_tear_db) * tear, span, shifts, echo)
        fizz_voice = voice(spray, crack, CRACK_TOP_HZ, SR)
        cut = unsung(amp(ring_level), low_song[span]) * ring_voice
        cut += unsung(amp(level + crack_db), high_song[span]) * crack_voice
        cut += amp(level + fizz[span]) * fizz_voice
        out[:, span] += gate[span] * grain[span] * amp(flutter_db * wobble(60)[span]) * cut
    return out


def notched(x, depth=.85):
    """Antiresonance: the board's dead bands carve sliding valleys into the whine."""
    out = x.copy()
    for start, end, first_hz, last_hz, width_hz in NOTCHES:
        span = slice(int(start * SR), int(end * SR))
        dead = resonance(out[:, span], first_hz, last_hz, width_hz)
        out[:, span] -= depth * swell(dead, curve=0.25)
    return out


def scene():
    """Superposition of all sources as mid and side, widened by frequency and split into left and right."""
    work = pushes()
    turn = head_turn(work)
    clicks = strokes(turn)
    song = squeals(clicks)
    background = machine(turn) + whistles() + hum(turn, work) + chatter() + sliding()
    mid, side = background + notched(cutting(clicks, work, song[0]) + song)
    side = filtered(side, lambda hz: amp(along(WIDTH, hz)))
    left = filtered(mid + side, lambda hz: amp(along(LEAN, hz) / 2))
    right = filtered(mid - side, lambda hz: amp(-along(LEAN, hz) / 2))
    return np.array([left, right])


def record(dry):
    """Gating and band limitation: silence for a few milliseconds at each gap, nothing above TOP_HZ."""
    gate = np.prod([np.clip((np.abs(TIME - s) - .0025) / .002, 0, 1) for s in GAPS], axis=0)
    m = next_fast_len(N + SR // 4)
    passed = np.fft.rfftfreq(m, 1 / SR) < TOP_HZ
    return irfft(rfft(dry * gate, m) * passed, m)[:, :N]


dry = scene()
out = record(dry)
wrap_up_sound(out)
```